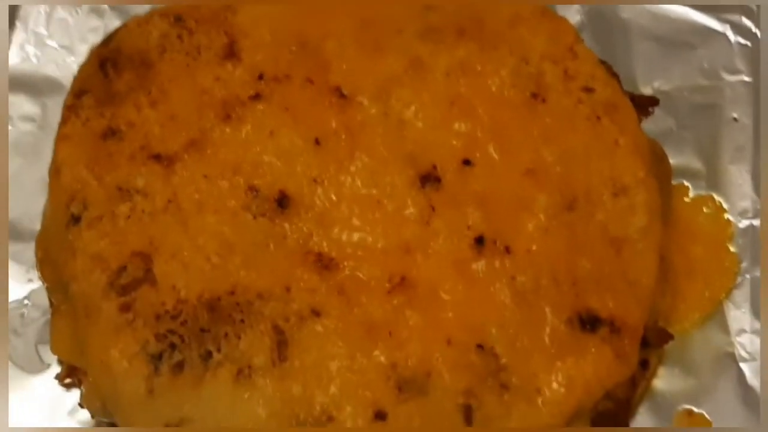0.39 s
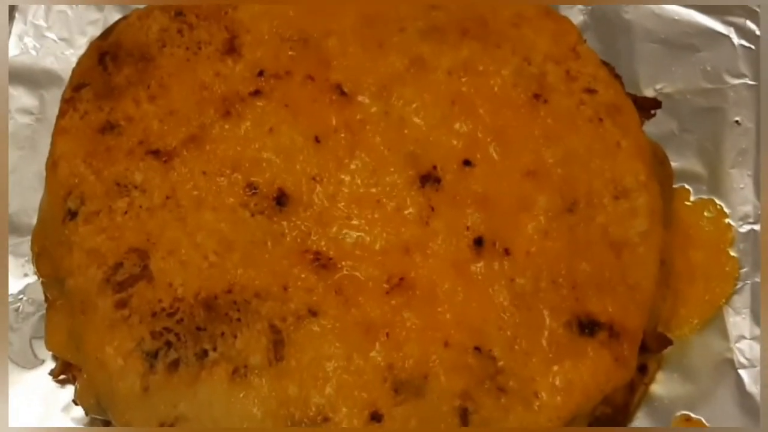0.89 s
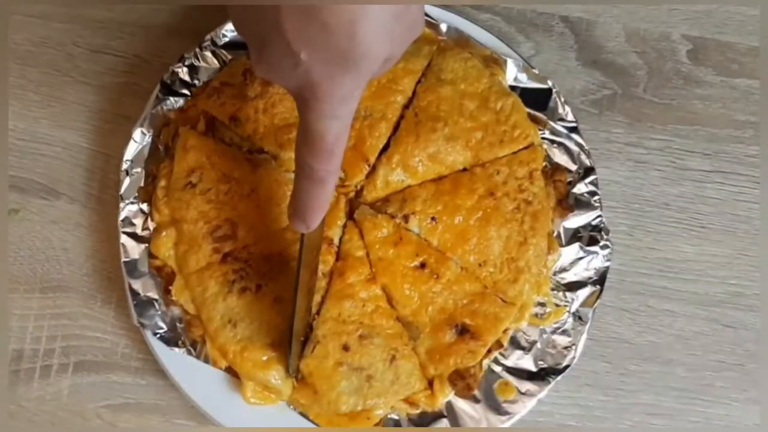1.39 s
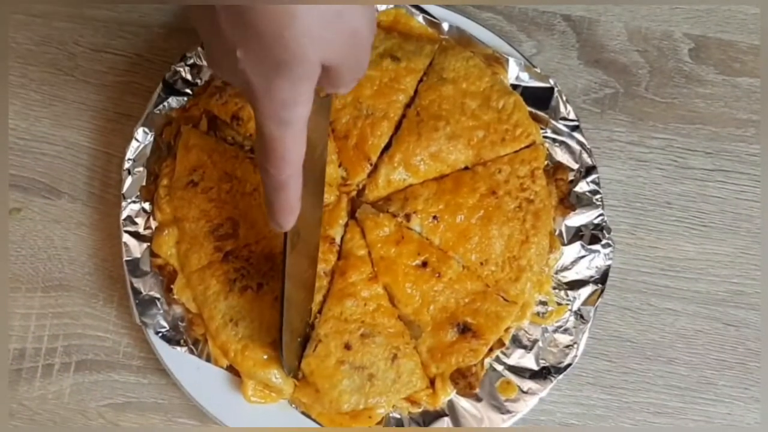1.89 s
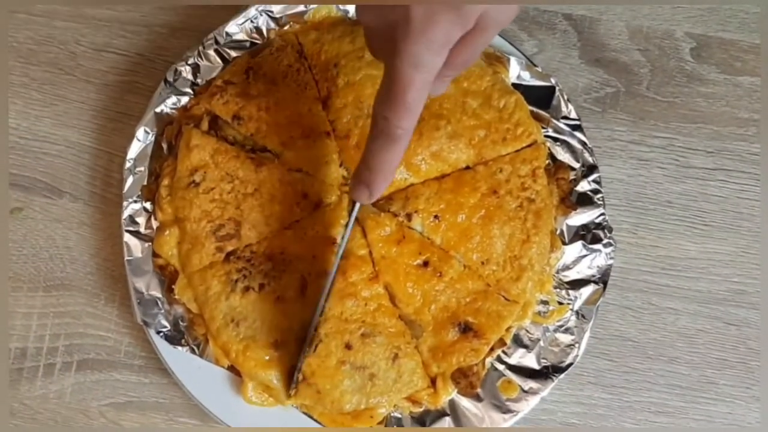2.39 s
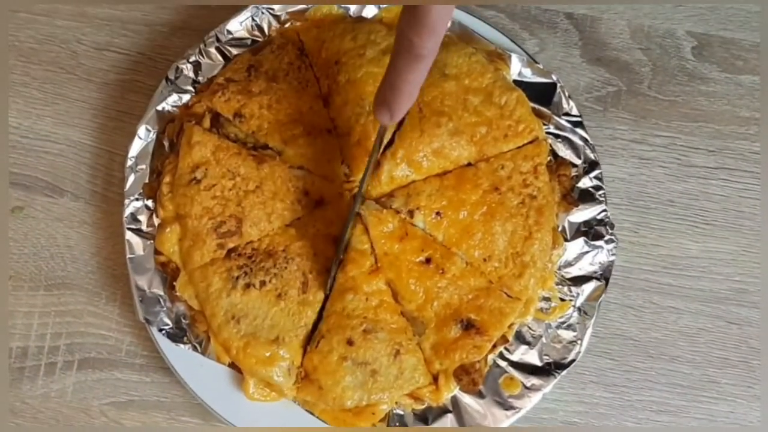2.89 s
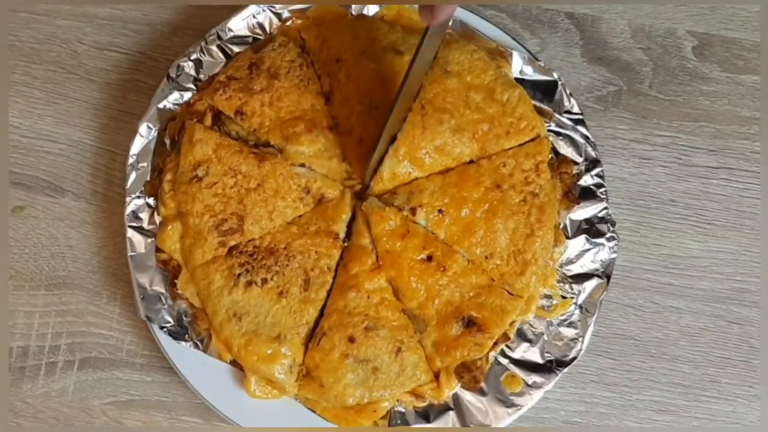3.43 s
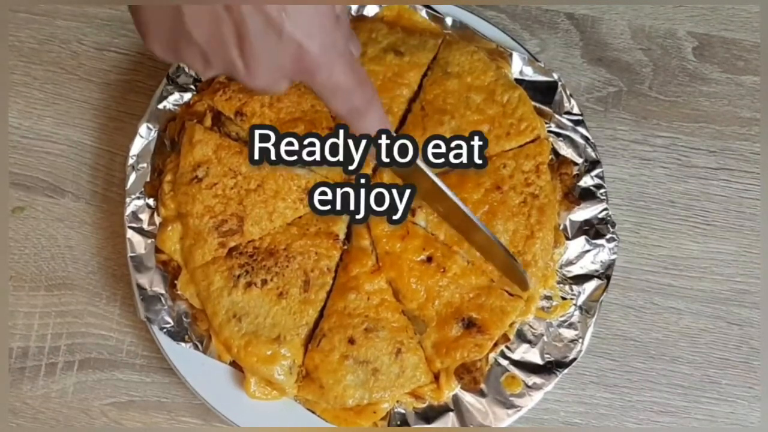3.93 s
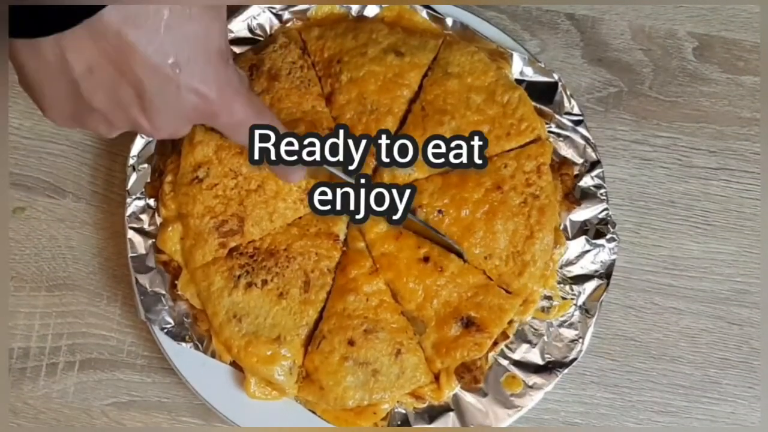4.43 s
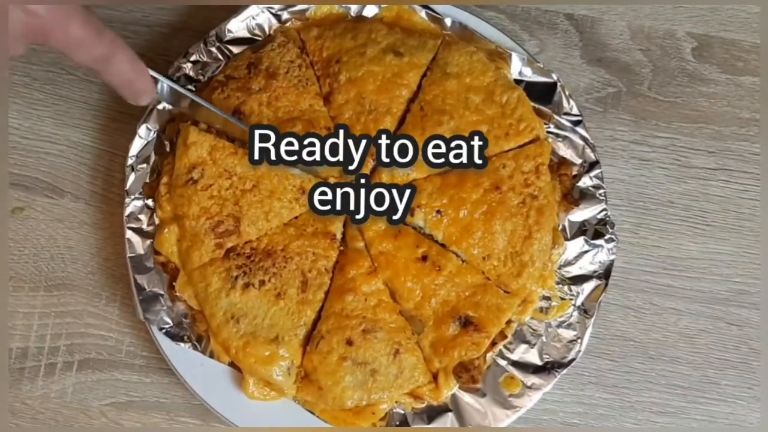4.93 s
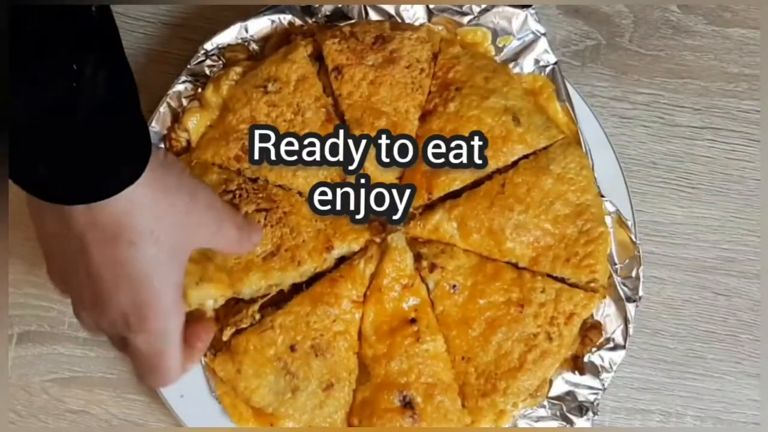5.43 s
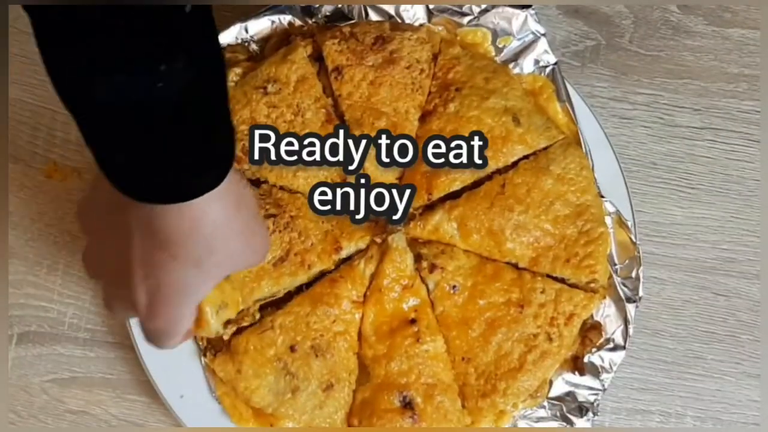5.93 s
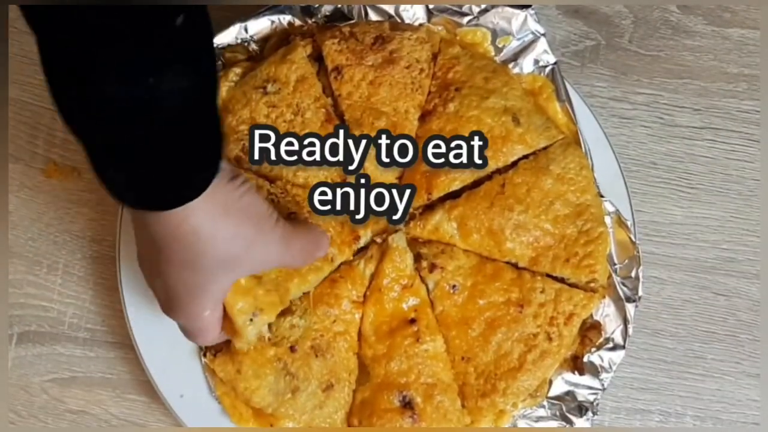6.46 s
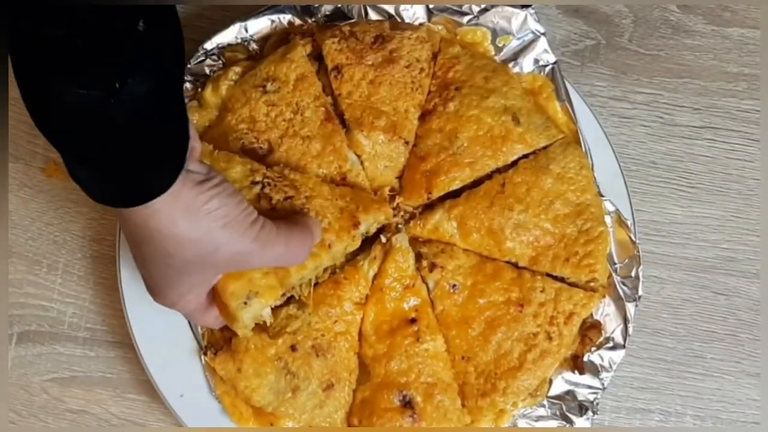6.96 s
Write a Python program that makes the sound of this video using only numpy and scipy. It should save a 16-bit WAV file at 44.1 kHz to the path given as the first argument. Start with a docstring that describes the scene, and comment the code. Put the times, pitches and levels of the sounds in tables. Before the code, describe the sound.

Short soft sizzle, metallic foil scrapes with a quick squeak, sharp blade knocks on a plate, then brittle crackling as a crusty piece is pulled loose.

```python
"""A small kitchen with mains hum, heard by a close pair of microphones: hot cheese sizzles for a moment,
then a knife scrapes over foil, saws through a toasted crust and knocks on the plate below, and a hand
pulls a crisp slice free. Sizzle and crust are coloured random clicks, the blade and plate are ringing
modes, the squeak is a pair of shaking tones; hum, air, rub, rumble and a short echo lie underneath."""
import sys
import numpy as np
from scipy import signal
from scipy.fft import rfft, irfft, next_fast_len
from scipy.io import wavfile
from scipy.ndimage import uniform_filter1d

SR = 44100
rng = np.random.default_rng(int(sys.argv[2]) if len(sys.argv) > 2 else 0)


def makeup_ratio(level_db):
    """Linear amplitude ratio for a level in decibels (20 dB per factor of ten)."""
    decades = np.asarray(level_db, float) / 20
    return 10 ** decades


def to_wav(s):
    """Save 16-bit WAV."""
    ch = np.atleast_2d(s).T  # columns
    pcm = np.round(np.clip(ch, -1, 1) * 32767)  # PCM
    wavfile.write(sys.argv[1], SR, pcm.astype(np.int16))


N = 312290
TIME = np.arange(N) / SR   # s

# spectrum of cracking crust, also of foil hiss: f/Hz, density/dB per Hz (relative)
CRUST_COLOUR = [(150, -36), (250, -15.5), (420, -24), (758, -11), (870, -14.5), (1110, -10.5), (1490, -3.5),
                (2930, -6.5), (4070, -2), (7720, -5), (8710, -18.5), (11300, -6.5), (15700, -4.5)]
# how hard food drags on the plate: t/s, dull rub level/dB
PRESSURE = [(0, -69.5), (.14, -85.5), (1.45, -88.5), (2.01, -73), (2.31, -81.5), (2.9, -81.5), (3.15, -65),
            (3.3, -87), (3.65, -74.5), (3.81, -83), (4.04, -86.5), (4.1, -67), (4.2, -77.5), (4.76, -64.5),
            (5.07, -73.5), (5.21, -83.5), (5.9, -87), (6.45, -75), (6.74, -86.5), (7.08, -82)]
# the wavering mains hum: t/s, level/dB
HUM_LEVEL = [(0, -59), (.1, -63), (1.16, -61.5), (1.26, -67), (4.9, -68), (5.36, -71), (6.0, -66),
             (7.08, -68)]
TREBLE_HZ = 9000   # where crust and foil split into body and treble


def rms_one(x):
    """Scale to rms 1."""
    return x / np.sqrt(np.mean(x ** 2) + 1e-20)


def gain_curve(rows):
    """Gain over time from rows of t/s, level/dB; silent after the last row."""
    s, db = np.transpose(rows)
    return makeup_ratio(np.interp(TIME, s, db, right=-200))


def colour(x, points, low_hz=20.0, high_hz=20000.0):
    """Shape a sound by a spectrum and keep one band of it; rms 1."""
    size = next_fast_len(N)
    hz = np.maximum(np.fft.rfftfreq(size, 1 / SR), 1)
    at, db = np.transpose(points)
    gain = makeup_ratio(np.interp(np.log(hz), np.log(at), db))
    gain = gain * (hz > low_hz) * (hz <= high_hz)
    return rms_one(irfft(rfft(x, size) * gain, size)[..., :N])


def drift(rate_hz):
    """Slow random wander with rms 1: low-passed noise drawn 60 times a second."""
    steps = rng.standard_normal(int(N / SR * 60) + 2)
    memory = np.exp(-2 * np.pi * rate_hz / 60)
    smooth = rms_one(signal.lfilter([1], [1, -memory], steps))
    return np.interp(TIME * 60, np.arange(len(steps)), smooth)


def grains(per_s, spread_db, alike, lag_s):
    """Random clicks of uneven size, partly shared by both sides; the right side hears shared ones late."""
    size_db = spread_db * np.minimum(rng.exponential(1, (3, N)), 5)
    sizes = makeup_ratio(size_db) * rng.choice([-1, 1], (3, N))
    shared, left, right = sizes * (rng.random((3, N)) < per_s / SR)
    late = np.interp(TIME - lag_s, TIME, shared)
    return np.sqrt(alike) * np.array([shared, late]) + np.sqrt(1 - alike) * np.array([left, right])


def ring(x, hz, t60):
    """Two-pole resonator: a unit click sets a decaying sine of height 1 ringing."""
    r, w = makeup_ratio(-60 / (t60 * SR)), 2 * np.pi * hz / SR
    return signal.lfilter([0, np.sin(w)], [1, -2 * r * np.cos(w), r * r], x + 1e-18)


def bursts(rows, crest_db, opposite=0):
    """Stereo envelopes of a main, a second and an opposite band: each burst swells, then dies; powers add."""
    power = np.zeros((3, 2, N))
    for s, db, other_db, swell, t60, pan_db in rows:
        swell = max(swell, 3e-4)
        start = s - 0.6 * swell   # the swell begins faintly before it is noticed
        span = slice(int(start * SR), int((s + .5) * SR))
        t = TIME[span] - start
        rise = np.sin(np.pi / 2 * np.clip(t / swell, 0, 1)) ** 2
        fall = makeup_ratio(-60 * np.maximum(t - swell, 0) / t60)
        # crest_db turns a peak level into an rms level
        level = rise * fall * makeup_ratio(db - crest_db + np.array([[pan_db], [-pan_db]]) / 2)
        band_gain = makeup_ratio(np.array([0, other_db, -opposite * other_db]))[:, None, None]
        power[:, :, span] += (level * band_gain) ** 2
    return np.sqrt(power)


def place(s):
    """Left-right dB of an event at time s."""
    # where the hands work: t/s, left over right level/dB
    hands = [(0, -23), (1.4, -11), (1.73, -0.5), (2.0, -3), (2.3, -0.5), (3.1, -2), (4.3, -3), (4.45, 0),
             (5.1, -1.2), (5.9, -0.5), (6.3, -1), (6.9, -0.5), (7.08, 1)]
    return np.interp(s, *np.transpose(hands))


def wide_noise(width):
    """Stereo white noise: a shared mid plus a side of opposite sign, width times as strong."""
    mid, side = rng.standard_normal((2, N))
    return mid + width * side * np.array([[1], [-1]])


def kitchen(x):
    """Room echo: four feedback delays a side, duller on every round, as one frequency response."""
    t60_s, wall_cut_hz = 0.29, 3500   # decay before the walls' treble loss
    size = next_fast_len(N + SR)
    w = 2 * np.pi * np.fft.rfftfreq(size, 1 / SR)
    spectrum = rfft(x.mean(axis=0), size)
    out = np.zeros((2, size // 2 + 1), complex)
    for k, lag in enumerate(rng.uniform(0.012, 0.025, size=8)):
        wall = 1 / (1 + 1j * w / (2 * np.pi * wall_cut_hz))
        loop = makeup_ratio(-60 * lag / t60_s) * np.exp(-1j * w * lag) * wall
        out[k % 2] += (-1) ** (k // 2) * spectrum * loop / (1 - loop)
    return irfft(out, size)[:, :N]


def air():
    """Steady, wide coloured noise of the room's air."""
    # spectrum of the air: f/Hz, density/dB per Hz (relative)
    air_colour = [(88, -33), (150, -2.5), (235, -11), (327, -10), (1250, -13), (1550, -11), (1740, -23),
                  (5490, -17.5), (7950, -35), (15700, -7.5)]
    return makeup_ratio(-75.5) * colour(wide_noise(1.7), air_colour)


def mains_hum():
    """A sine near 50 Hz whose pitch and level waver."""
    phase = 2 * np.pi * np.cumsum(50.5 + 1.0 * drift(9.3)) / SR   # Hz
    tone = np.sqrt(2) * np.sin(phase)
    return gain_curve(HUM_LEVEL) * makeup_ratio(2.4 * drift(6.1)) * tone


def rumble(near):
    """Low noise that follows the hum and swells as the work shakes the table."""
    # spectrum of the rumble: f/Hz, density/dB per Hz (relative)
    rumble_colour = [(15, -14), (60, 0), (100, -6.5), (150, -10), (220, -24), (400, -63.5)]
    under_hum = gain_curve(HUM_LEVEL) * makeup_ratio(-11)
    work_power = uniform_filter1d(near.mean(axis=0) ** 2, round(.05 * SR))
    work = np.sqrt(np.maximum(work_power, 1e-20))
    shake = makeup_ratio(-73) * (work / makeup_ratio(-53.5)) ** .4   # -73 dB when the work sounds at -53.5 dB
    return colour(wide_noise(0.57), rumble_colour) * np.hypot(under_hum, shake)


def plate_rub():
    """Food drags dully on the plate: dark noise that follows the pressure."""
    # spectrum of the rub: f/Hz, density/dB per Hz (relative)
    rub_colour = [(88, -34.5), (150, -2), (354, -2), (677, -17.5), (1150, -16), (1260, -19.5), (1520, -13),
                  (2500, -16), (3250, -57), (5500, -120)]
    rub = colour(wide_noise(0.39), rub_colour) * makeup_ratio(1.5 * drift(15.0))
    return gain_curve(PRESSURE) * rub


def sizzle():
    """Tiny bubbles burst in the fat, thousands a second, with a few louder spits."""
    # spectrum of the sizzle: f/Hz, density/dB per Hz (relative)
    fat_colour = [(590, -11), (1000, -11), (1200, -17), (1880, -13), (2070, -10.5), (2760, -12),
                  (4790, 4.5), (7600, 2.5), (8820, -7.5), (11600, 1), (15700, 3.5)]
    steady_db, fresh_db, fresh_s = -61.5, 6.5, 0.35   # level, extra at first and its fading time
    end_s, die_db_per_s = 1.186, 850
    fizz = colour(grains(11000.0, 4.75, 0.067, 1e-4), fat_colour)
    level_db = steady_db + fresh_db * np.exp(-TIME / fresh_s)
    level_db -= die_db_per_s * np.maximum(TIME - end_s, 0)
    return makeup_ratio(np.maximum(level_db, -200) + 0.9 * drift(2.4)) * fizz


def squeak():
    """A rough pair of stick-slip tones as the blade leaves the foil: the pitch shakes fast about its glide."""
    # glide of the upper tone: t/s, f/Hz, level/dB before the left-right gains
    glide = [(1.99, 2185, -80), (2.04, 2190, -65), (2.1, 2076, -69), (2.16, 2070, -89)]
    s, hz, db = np.transpose(glide)
    shake = rms_one(signal.lfilter([1], [1, -.97], rng.standard_normal(N)))
    pitch = np.interp(TIME, s, hz) * (1 + .05 * shake)
    level = makeup_ratio(np.interp(TIME, s, db, left=-200, right=-200) + 2.5 * drift(25.0))
    phase = 2 * np.pi * np.cumsum(pitch) / SR
    tones = np.sin(phase) + makeup_ratio(-3.0) * np.sin(.7 * phase)   # the second tone is lower
    return level * tones * makeup_ratio(np.array([[4.0], [-1.5]]))


def knocks():
    """The blow passes through the soft food, so each mode swells before it dies; a duller chatter follows."""
    # blade, later the lifted slice, meeting the plate:
    # t/s, level/dB, thud level/dB and lower ring level/dB above that
    blow_rows = [(1.85, -63, -5.5, -7), (2.4086, -56.5, -1, -1), (2.4984, -68.5, -3.5, 2.5),
                 (2.544, -54.5, -22, -12), (2.5819, -50, -0.5, -5), (2.5968, -53, -6.5, -16),
                 (2.6248, -59, -26, -18), (2.7689, -57.5, 3, -22), (2.785, -53.5, -8, -13),
                 (2.9584, -57, -1.5, -4), (2.9887, -62, -6, -1), (3.1045, -27.5, -17.5, -10.5),
                 (3.2762, -41, -11, 0), (3.2844, -34, -14.5, -4.5), (3.4474, -48, -7, -0.5),
                 (3.5666, -31.5, -9.5, -2.5), (4.0952, -37.5, -17, -15), (4.2682, -12, -21.5, -8.5),
                 (4.2927, -35, -6.5, 4), (4.302, -43, -8, -5), (4.4515, -20, -22.5, -24),
                 (4.6476, -41, -27, -11), (4.6565, -40.5, -19, -7.5), (4.7119, -77, 18, -11),
                 (4.738, -58, -10, -7), (4.8376, -30.5, -20.5, -5), (4.9373, -53, -33.5, -8),
                 (5.0444, -55, -13, -3), (5.0583, -58.5, -10, -12), (5.0773, -60, -5.5, 2.5),
                 (5.0947, -65.5, -12.5, 1), (6.1098, -39.5, -31, -6.5), (6.2015, -44.5, -31.5, -31.5),
                 (7.0183, -58, -35.5, -11)]
    # plate modes: f/Hz, level/dB (relative), decay setting/s (the ring dies somewhat sooner)
    plate_modes = [(182, -9.5, 0.11), (248, -6.5, 0.086), (364, -4.5, 0.071), (533, -3, .045),
                   (638, -3.5, 0.049), (748, -9, 0.015), (1188, 0.5, 0.022), (1538, -4.5, 0.022),
                   (1614, -6, 0.011), (2220, -22.5, .012), (2760, -5.5, 0.0088), (3620, -7, .012),
                   (3920, -2.5, .012), (4600, -7, .008), (6000, -7.5, .006)]
    thud_top_hz, lower_ring_top_hz, tick_foot_hz = 900, 1300, 2500
    # every blow lands again, weaker and duller: s, dB, thud dB, lower ring dB
    rebound = np.array([.0085, -15.5, 4, 2])
    blows = [row + rebound * k for row in np.array(blow_rows) for k in range(2)]
    out = np.zeros((2, N + SR))
    t = TIME[:round(.15 * SR)]
    late = round(1.1e-4 * SR)   # the left side hears the blow late
    for s, db, thud_db, lower_db in blows:
        tick_db = -17.5 - .25 * (db + 50)   # the tick grows more slowly than the blow
        rings = np.zeros((2, len(t)))   # for the blow and for the chatter
        for hz, mode_db, decay_s in plate_modes:
            blow_off, chatter_off, jolt = rng.standard_normal(3)
            extra_db = 0
            if hz < thud_top_hz:
                extra_db = thud_db
            elif hz < lower_ring_top_hz:
                extra_db = lower_db
            elif hz > tick_foot_hz:
                extra_db = tick_db
            if hz < 560:   # hard, short blows reach the lowest modes less
                extra_db -= 0.24 * (db + 52.5)
            level = makeup_ratio(mode_db + extra_db * np.array([[1], [.6]])) * makeup_ratio(1.5 * jolt)
            pitch = hz * (1 + np.array([[0.03 * blow_off], [.12 * chatter_off]]))
            age = t * np.log(1000) / decay_s * 1.72
            rings += level * age * np.exp(1 - age) * np.sin(2 * np.pi * pitch * t)
        # chatter: 600 random taps a second of either sign, shared and one-sided, falling 20 dB in 60 ms
        draws = rng.random((3, len(t)))
        taps = (draws < 600.0 / SR) * np.sign(draws * SR % 2 - 1)
        taps = taps[0] + 0.78 * taps[1:]
        taps = taps * makeup_ratio(-12.5 + .45 * thud_db - 20 * t / .06)   # soft blows drag on
        sound = signal.fftconvolve(taps, rings[1:], axes=1)
        sound[0, late:late + len(t)] += rings[0]
        sound[1, :len(t)] += rings[0]
        pan_db = place(s)
        begin = round(s * SR)
        out[:, begin:begin + sound.shape[1]] += sound * makeup_ratio(db + np.array([[pan_db], [-pan_db]]) / 2)
    return out[:, :N]


def scrapes():
    """The edge stutters over the foil and shakes the blade's modes, with some plain foil hiss."""
    # blade slipping on foil: t/s, nominal peak level/dB, lower modes level/dB above that, swell/s, t60/s
    slip_rows = [(1.335, -65, -14, .005, .08), (1.3808, -32.5, -28.5, 0.0032, 0.073),
                 (1.494, -60.5, -11, .006, .25), (1.5469, -45.5, -23, .012, 0.11),
                 (1.559, -46, -17, .007, .16), (1.651, -42, -28, .016, .18),
                 (1.6607, -38.5, -18, .0024, 0.11), (1.854, -55.5, -18, .0059, 0.16),
                 (1.96, -37, -28.5, 0.004, 0.13), (1.966, -30.5, -21, 0.0025, 0.12),
                 (1.9864, -35, -14.5, .014, 0.16), (2.004, -28, -17.5, 0.0072, .098),
                 (2.011, -23, -19, 0.015, 0.07), (2.0224, -32, -9.5, .0036, .12),
                 (2.0594, -54.5, -2, .006, 0.061), (2.163, -47.5, -17.5, 0.011, .3),
                 (3.701, -62.5, -3, 0.013, 0.21)]
    # blade modes: f/Hz, level/dB (relative), t60/s
    blade_modes = [(2084, -5.5, 0.042), (2710, -6.5, 0.028), (3830, -4, .02), (5640, 9, 0.0047),
                   (7000, 6.5, 0.0095), (8080, 1, 0.039), (10380, -2, 0.036), (10400, -2.5, 0.048),
                   (11300, -10.5, 0.0044), (13170, -8.5, 0.061), (13110, 0.5, 0.032), (15200, -4, 0.056),
                   (14700, 2.5, 0.045), (15700, -13, 0.019)]
    slips = rms_one(grains(6000.0, 4.0, .7, 1e-4))
    panned = [(*row, -8.5) for row in slip_rows]   # left-right dB
    upper, lower, _ = bursts(panned, crest_db=9.5)
    out = makeup_ratio(-6.5) * upper * colour(slips, CRUST_COLOUR, low_hz=TREBLE_HZ)
    for hz, db, t60 in blade_modes:
        force = upper if hz > TREBLE_HZ else lower
        force = force * makeup_ratio(4.0 * drift(25.0) - 2.5)   # the contact point wanders, so modes come and go
        pushes = force * slips * rng.choice([-1, 1], N)
        kept_energy = makeup_ratio(-60 / (t60 * SR)) ** 2
        evened = np.sqrt(2 * (1 - kept_energy))   # long and short rings come out equally strong
        out += makeup_ratio(db - 5.5) * evened * ring(pushes, hz, t60)
    return out


def crust_breaks():
    """Rows for bursts(): slow breaks die more slowly, and crumbs fall after each snap."""
    # crust breaking: t/s, nominal peak level/dB, treble level/dB above that, swell/s
    crunches = [(0.0254, -45, -36.5, 0.016), (1.6874, -40, 4, 0.023), (1.702, -31, -7, 0.029),
                (1.72, -22.5, -8, 0.036), (1.7453, -36, -12, .014), (2.2084, -41, -32, 0.039),
                (2.249, -39.5, -8.5, 0.02), (2.537, -46, 9, 0.019), (2.5794, -50.5, -17, 0.014),
                (3.033, -50.5, -4, 0.081), (3.091, -53, -30, 0.011), (3.2394, -59.5, 7, 0.09),
                (3.2853, -59, -15, .014), (3.441, -58.5, -37, 0.022), (4.005, -52.5, -17, 0.019),
                (4.065, -49.5, 3, 0.023), (4.159, -46, 9, 0.0085), (4.2662, -28.5, -6, 0.013),
                (4.4493, -46, -45.5, 0.013), (4.5715, -61, -9, .02), (4.6376, -52, -37, 0.012),
                (4.739, -44, -26, 0.046), (4.818, -48.5, -33.5, .016), (4.9396, -46.5, -33, 0.03),
                (5.0155, -50.5, -24, 0.0094), (5.581, -55.5, 12.5, 0.023), (5.7674, -42, -4, .015),
                (5.85, -62, 7, .022), (5.8827, -29.5, 2.5, 0.021), (5.896, -22.5, -0.5, 0.016),
                (5.9916, -32.5, -0.5, .0058), (6.0924, -31, -4, 0.03), (6.102, -27.5, -8, 0.013),
                (6.4338, -46, 8.5, .012), (6.4725, -36.5, -1, 0.04), (6.974, -56, 7.5, .016),
                (7.016, -36, 4.5, 0.0067)]
    # single shards snapping: t/s, nominal peak level/dB, treble level/dB above that
    snaps = [(.0333, -49, -11), (1.737, -29, -24), (3.1674, -49, -10), (4.1954, -40, -4),
             (4.2573, -25, 7.5), (4.3805, -44, -9), (5.8497, -50.5, 1.4), (5.8825, -29, 1.5),
             (5.893, -27, 5), (5.9284, -35, -5), (5.9944, -34, 1), (6.0398, -34.5, 5.5), (6.1104, -25, -3),
             (6.1635, -42, 11), (6.201, -27.5, -5), (6.224, -25, 2.5), (6.2577, -29, -4),
             (6.2983, -27.5, 1.2), (6.347, -36.5, -6), (6.471, -36, -9), (6.506, -31.5, 9),
             (7.016, -31, 14.5)]
    rows = []
    for s, db, treble_db, swell in crunches:
        rows.append((s, db, treble_db, swell, .15 + 1.2 * swell, place(s)))
    for s, db, treble_db in snaps:
        rows.append((s, db, treble_db, .001, 0.025, place(s)))
        rows.append((s, db - 11, 1, 0.011, 0.12, place(s)))   # crumbs
    return rows


def crust():
    """Dense cracks in the toast: bursts where it breaks, single snaps, a thin rustle in between."""
    # how much the food is being moved: t/s, crust rustle level/dB
    rustle = [(0, -77), (1.03, -80.5), (1.18, -94), (1.58, -82), (1.67, -70), (1.87, -79), (2.01, -64),
              (2.13, -75), (2.4, -83), (3.15, -80.5), (3.65, -80), (3.85, -84.5), (3.99, -86), (4.1, -63),
              (4.25, -65.5), (4.95, -70), (5.21, -86), (5.48, -95.5), (5.66, -72.5), (5.84, -76),
              (5.92, -49), (6.06, -69.5), (6.13, -57), (6.51, -61), (6.62, -85.5), (6.75, -88), (7.08, -84)]
    cracks = grains(5000.0, 4.0, .35, 1e-4) * makeup_ratio(1.2 * drift(25.0))
    whole = colour(cracks, CRUST_COLOUR, high_hz=TREBLE_HZ)

    body, edges = whole, [1000, 2000, 3200, 5000, 8000]   # Hz
    for pair in zip(edges, edges[1:]):   # each size of crack comes and goes
        band = signal.sosfilt(signal.butter(1, pair, "band", fs=SR, output="sos"), whole)
        body = body + band * (makeup_ratio(3.5 * drift(18.0)) - 1)
    body = rms_one(signal.sosfilt(signal.butter(2, 1000.0, "high", fs=SR, output="sos"), body))
    treble = colour(cracks, CRUST_COLOUR, low_hz=TREBLE_HZ) * makeup_ratio(1.0 * drift(14.0))
    bass = rms_one(signal.sosfilt(signal.butter(1, 900.0, fs=SR, output="sos"), whole))

    # dull breaks go deeper
    body_burst, treble_burst, bass_burst = bursts(crust_breaks(), crest_db=16.5, opposite=0.59)
    body_rustle = gain_curve(rustle)
    # foil rustles 5 dB over the crust at a light rub of -86.5 dB; harder pressure holds it still
    foil = makeup_ratio(5) * (makeup_ratio(-86.5) / gain_curve(PRESSURE)) ** 0.53
    treble_rustle = body_rustle * foil
    return (body * np.hypot(body_burst, body_rustle)
            + treble * np.hypot(treble_burst, treble_rustle)
            + makeup_ratio(-11.5) * bass * bass_burst)


def scene():
    """All sources, the near ones with their room."""
    near = squeak() + knocks() + scrapes() + crust()
    background = air() + mains_hum() + rumble(near) + plate_rub()
    return background + makeup_ratio(-18.5) * kitchen(near) + sizzle() + near


def top_cut(x):
    """Nothing passes above the cut-off."""
    return signal.sosfilt(signal.butter(12, 16830, fs=SR, output="sos"), x)


def record(dry):
    """A steep low-pass removes the top above 16 kHz."""
    low_pass = signal.cheby2(20, 50, 16030, fs=SR, output="sos")
    mix = signal.sosfilt(low_pass, dry)
    return top_cut(mix)


dry = scene()
out = record(dry)
to_wav(out)
```